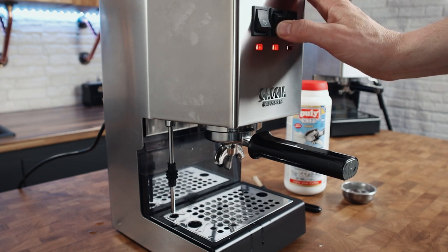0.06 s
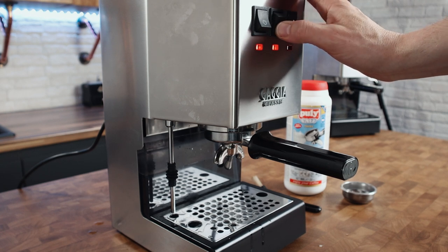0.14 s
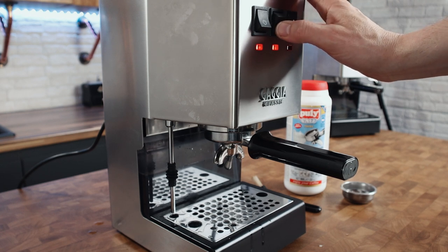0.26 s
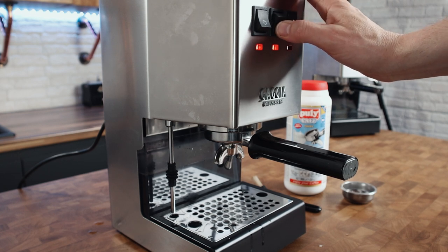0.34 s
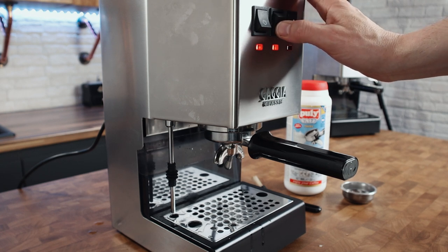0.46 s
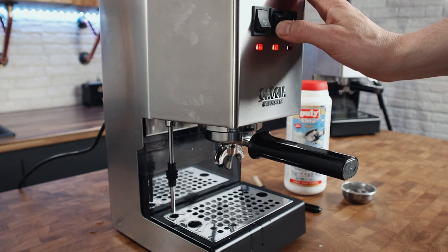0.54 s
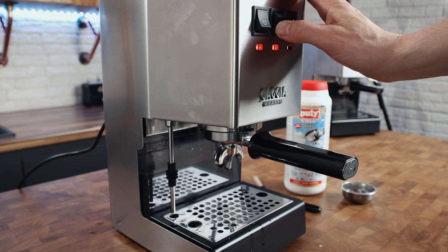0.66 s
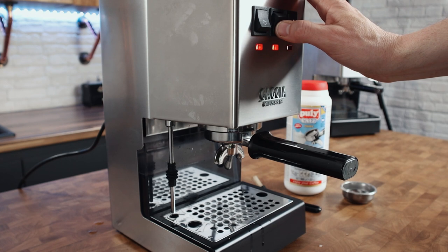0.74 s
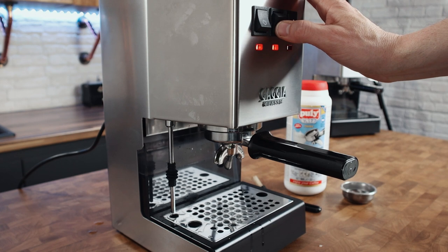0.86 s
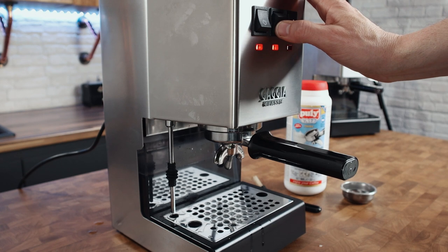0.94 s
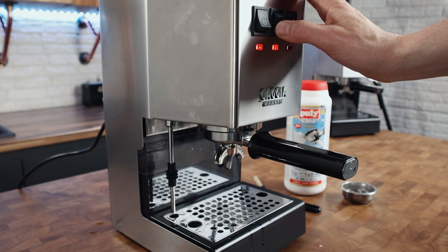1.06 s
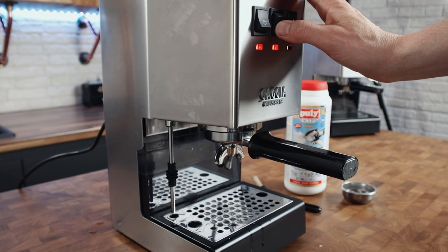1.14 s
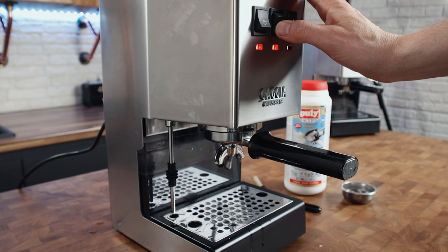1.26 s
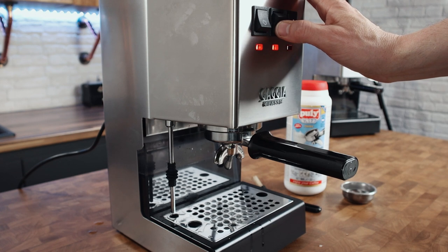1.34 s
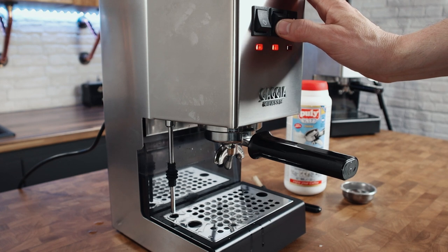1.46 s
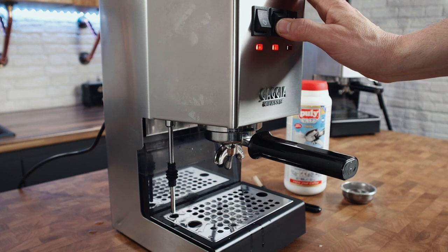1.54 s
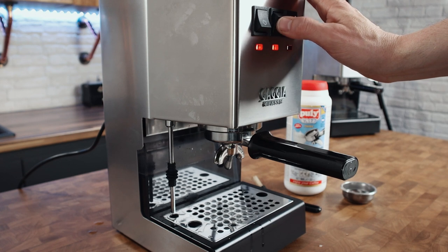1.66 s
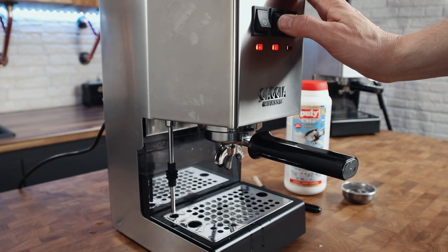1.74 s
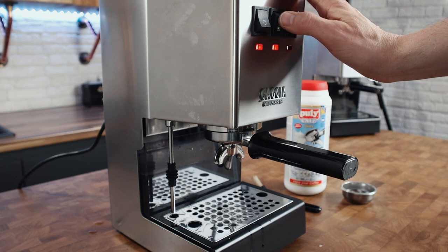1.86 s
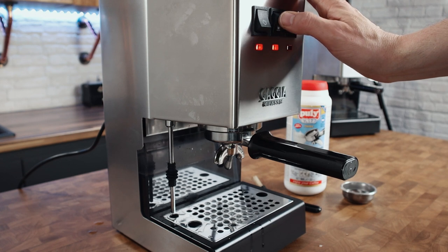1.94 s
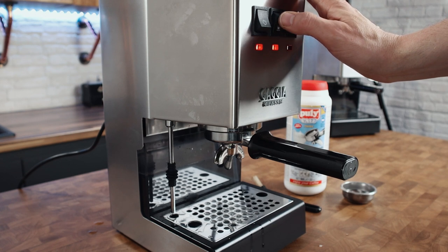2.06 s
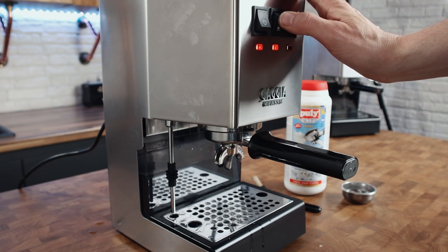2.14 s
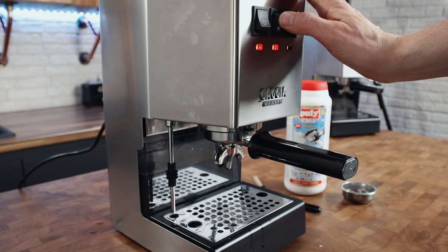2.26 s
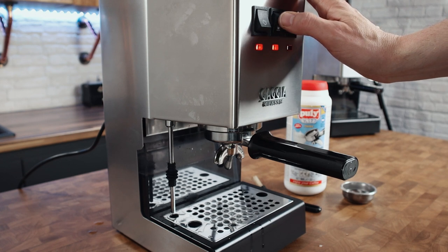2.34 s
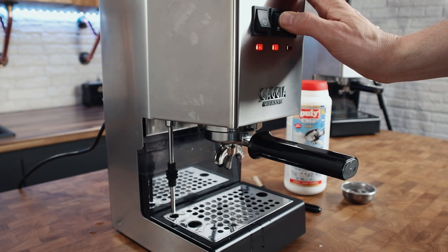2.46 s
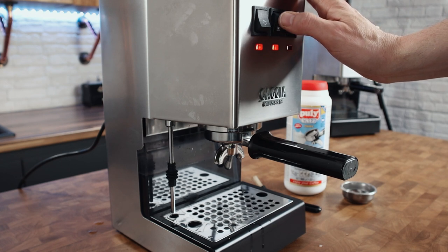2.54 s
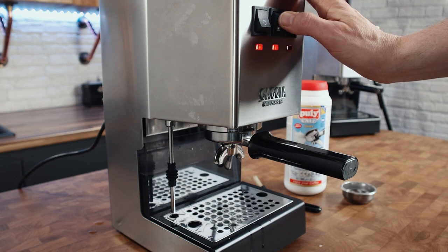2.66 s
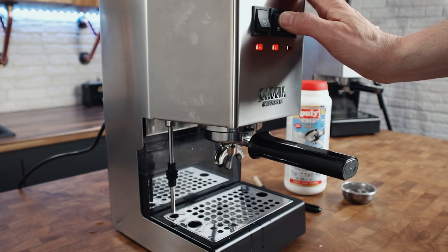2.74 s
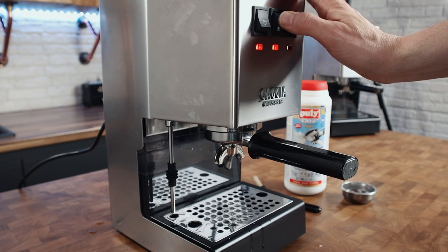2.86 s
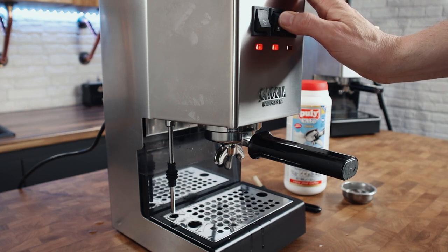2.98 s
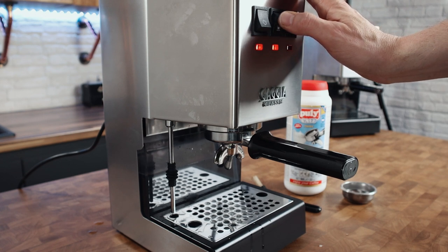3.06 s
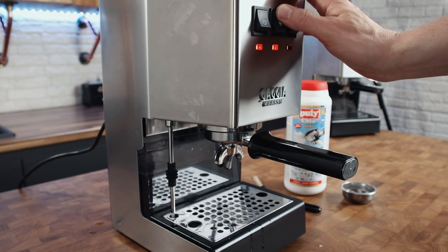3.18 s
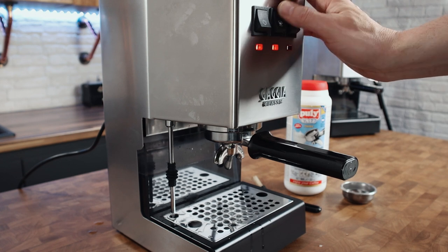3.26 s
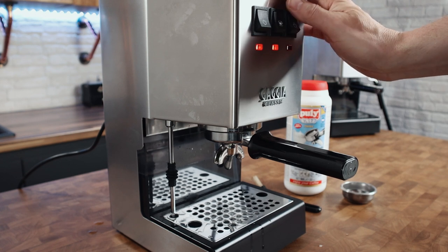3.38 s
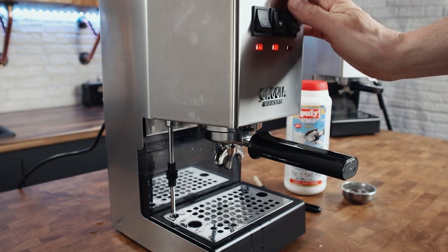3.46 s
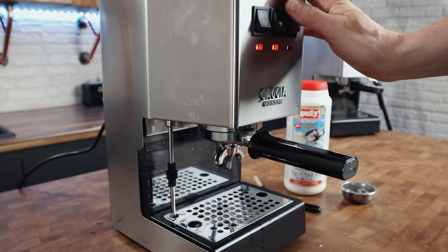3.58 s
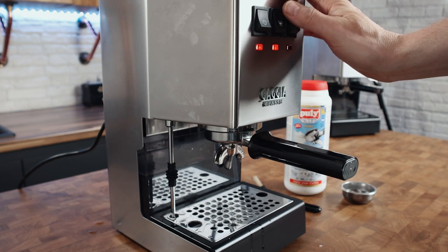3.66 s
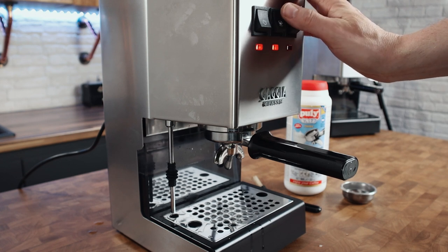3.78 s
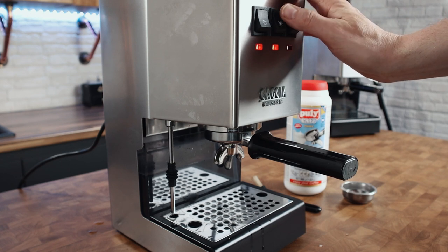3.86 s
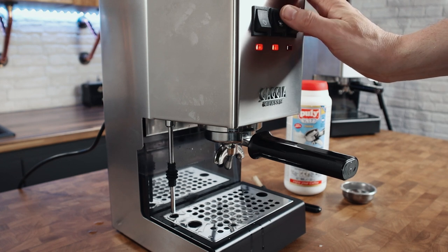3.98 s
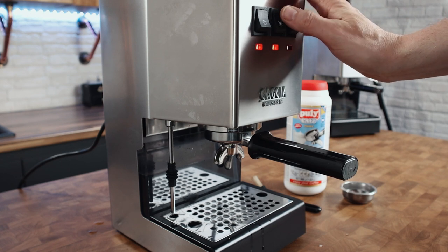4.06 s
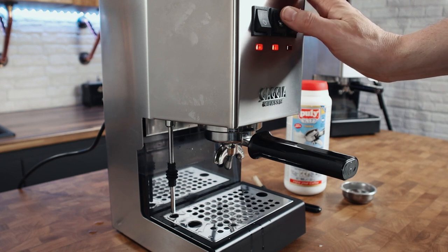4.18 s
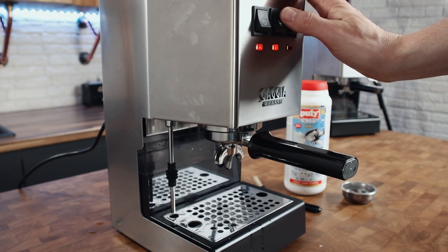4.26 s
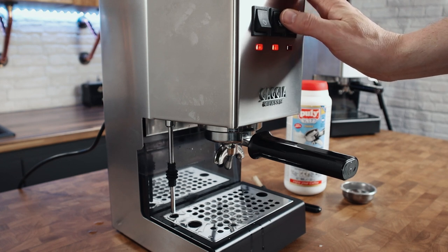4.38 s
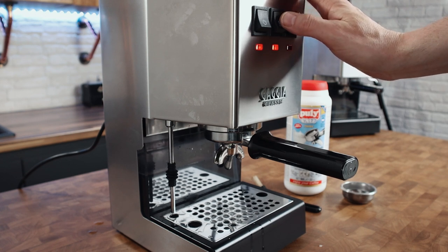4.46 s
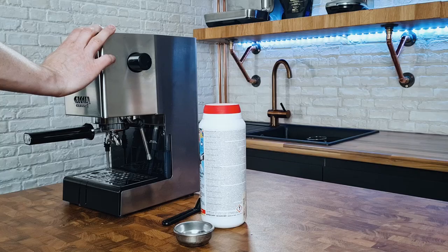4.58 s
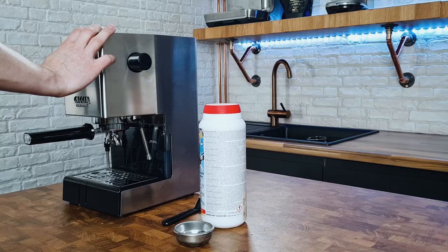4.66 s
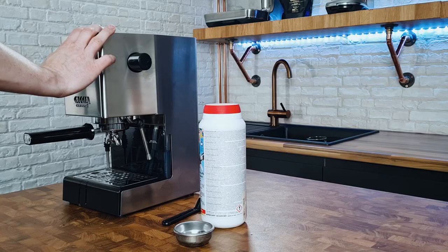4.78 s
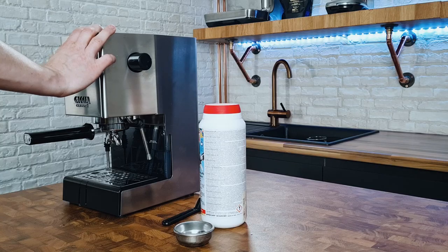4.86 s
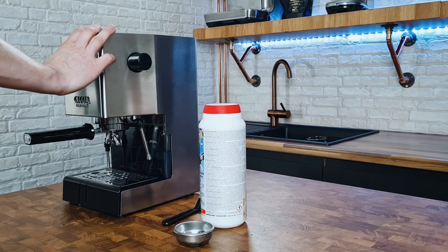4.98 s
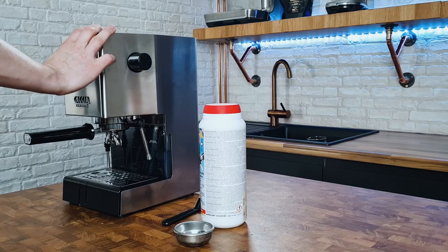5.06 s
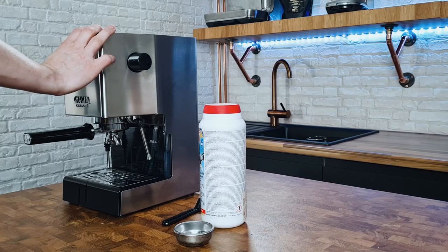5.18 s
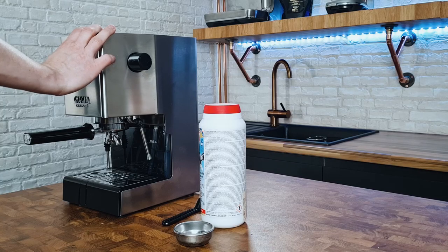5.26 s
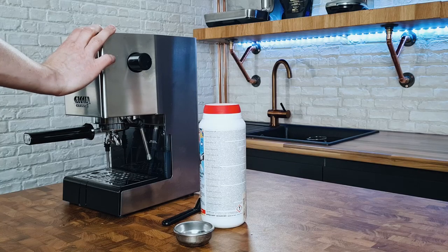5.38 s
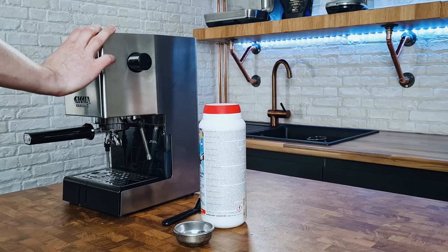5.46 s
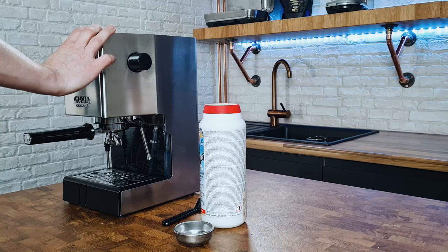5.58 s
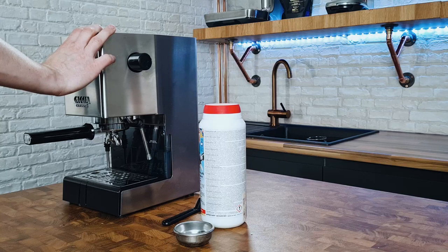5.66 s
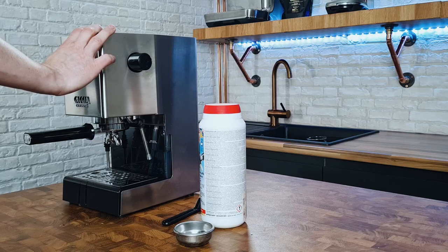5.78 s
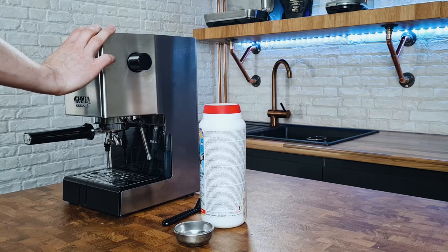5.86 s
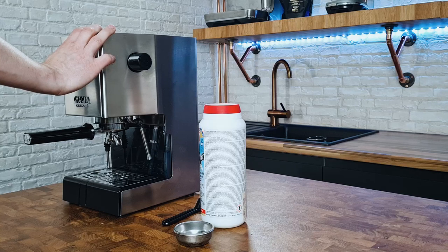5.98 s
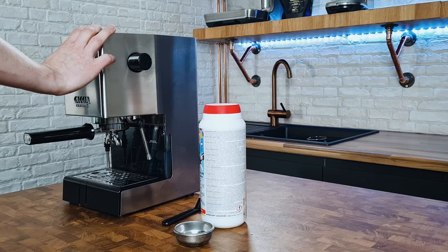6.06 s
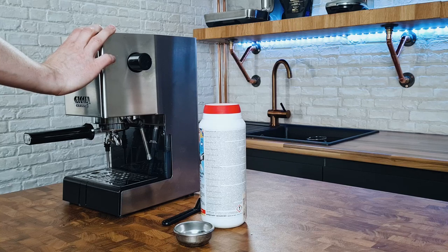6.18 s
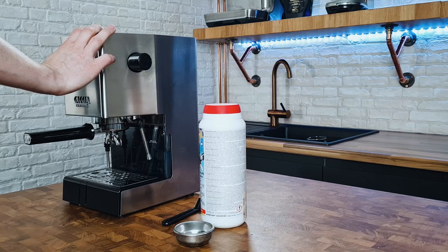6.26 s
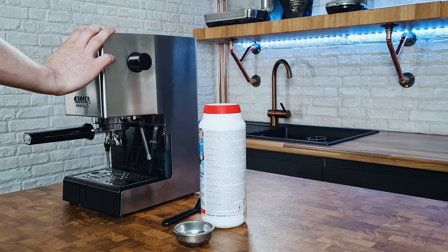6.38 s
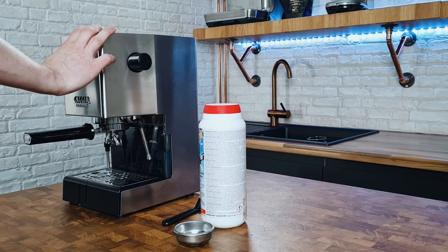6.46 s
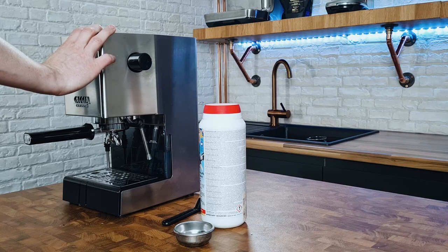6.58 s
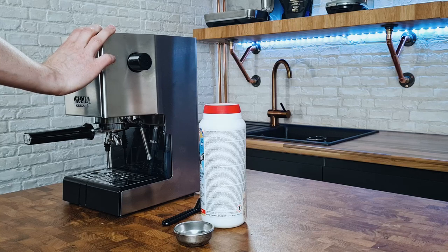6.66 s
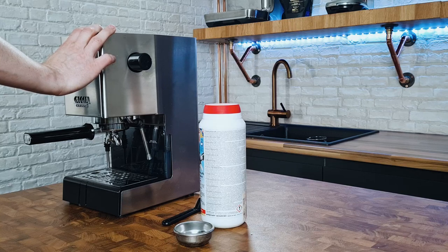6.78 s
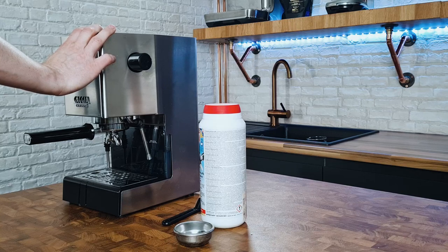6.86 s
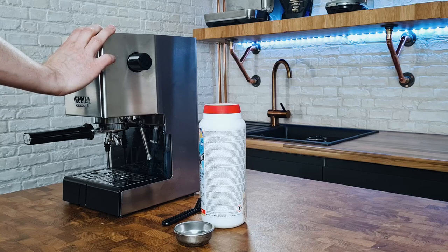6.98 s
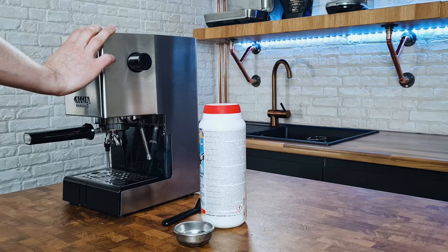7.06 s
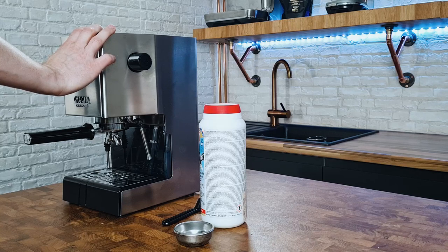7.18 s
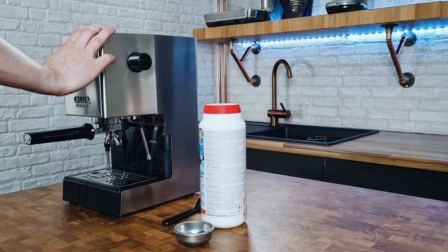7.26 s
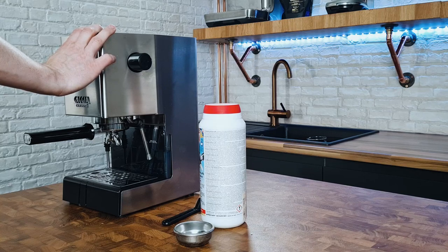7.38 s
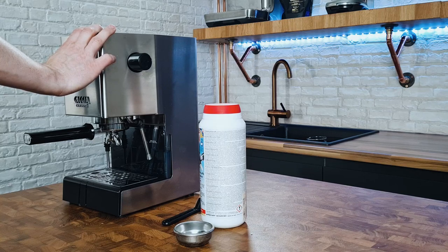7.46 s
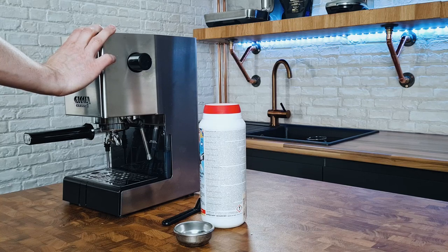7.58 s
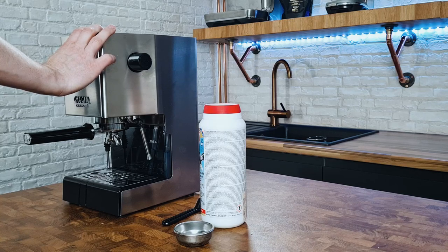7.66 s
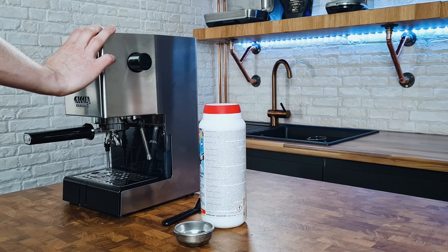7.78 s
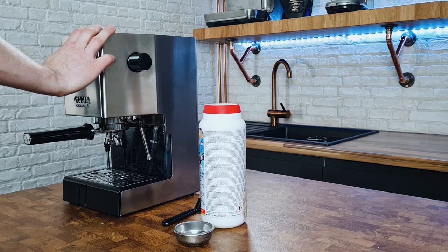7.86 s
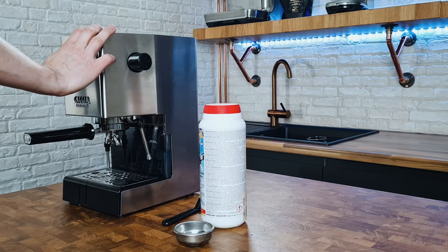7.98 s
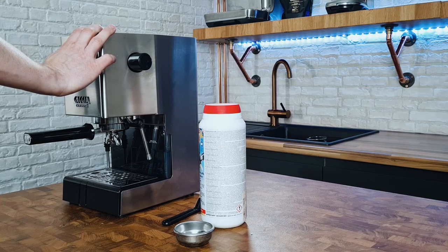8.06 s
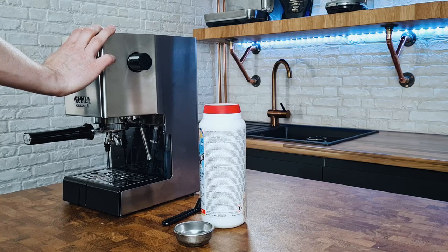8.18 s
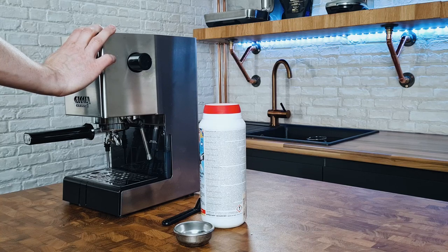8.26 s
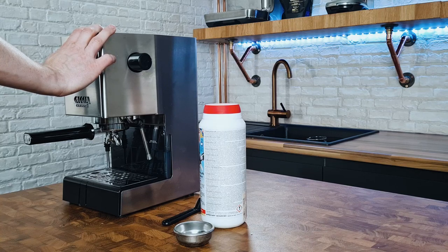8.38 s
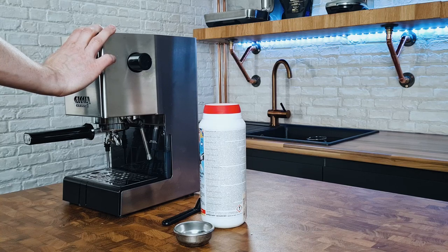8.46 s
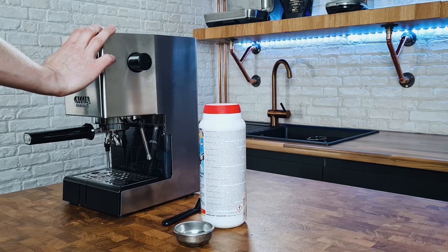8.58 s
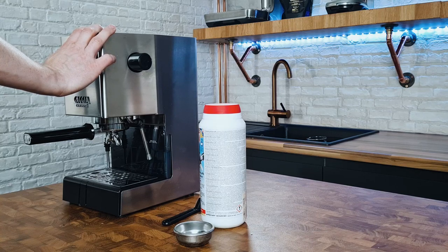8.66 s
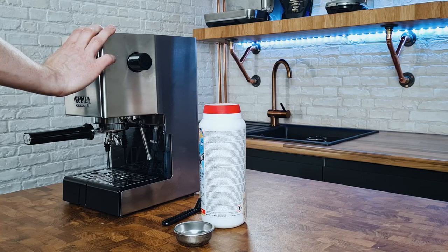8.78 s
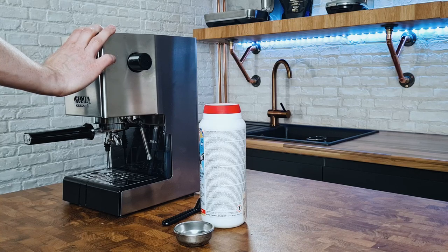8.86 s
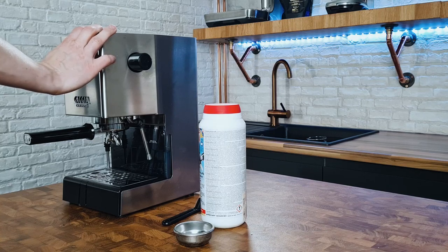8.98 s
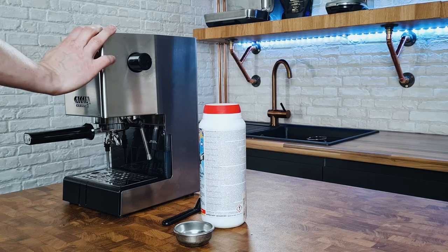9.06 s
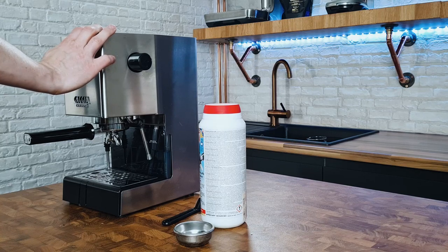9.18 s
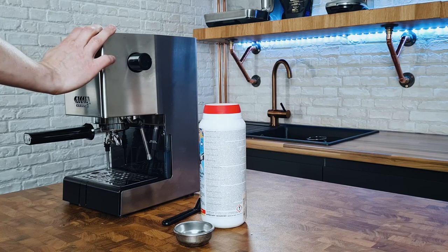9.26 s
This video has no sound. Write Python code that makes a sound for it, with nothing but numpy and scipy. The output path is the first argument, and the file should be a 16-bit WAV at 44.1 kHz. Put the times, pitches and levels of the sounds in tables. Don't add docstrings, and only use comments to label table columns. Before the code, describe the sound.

Close to the microphone in a hard-walled kitchen, an espresso machine's pump is already buzzing at mains rate, with pressurised water hissing and a loose panel rattling in bouts. A sharp clack stops it, small drips follow in the tray, and a faint room rumble remains. Another clack with a short spurt starts a second run, its tone climbing as pressure builds, until a final clack cuts it off.

```python
import sys
import numpy as np
from scipy import signal
from scipy.fft import rfft, irfft
from scipy.io import wavfile
from scipy.ndimage import uniform_filter1d

SR = 44100
rng = np.random.default_rng(int(sys.argv[2]) if len(sys.argv) > 2 else 0)


def gain_from_db(level_db):
    decades = np.asarray(level_db, float) / 20
    return 10 ** decades


def digitize_waveform(pressure):
    field = np.atleast_2d(pressure).T
    bounded = np.clip(field, -1, 1)
    quanta = np.round(bounded * 32767).astype(np.int16)
    wavfile.write(sys.argv[1], SR, quanta)


N = 411012
TIME = np.arange(N) / SR
COARSE = TIME[::40]
STROKE_HZ = 49.94

# [from t/s, to t/s]
RUN_SPANS = [
    (0, 3.25),
    (4.906, 8.99),
]
SWITCHED_ON_S = [-.17, 4.906]
STROKE_AT = [.7377, 6.0082]
FULL_AFTER_S, BUILD_S = 0.74, 0.37
START_SHARE = [0.32, .02]

# [first run level/dB, second run level/dB,
# extra at switch-on level/dB, settling t/s, first run creep/(dB/s), second run creep/(dB/s)]
CASING_LEVEL = (-49.5, -49.5, 13, 0.5, 1.3, 0.46)
PISTON_LEVEL = (-48, -50, 0, 2.7, -0.12, -0.09)
WATER_LEVEL = (-50.5, -50, 6.5, 0.25, -0.86, -1.1)

# [multiple of stroke rate, first run level/dB, second run level/dB, filling level/dB]
HUM_ORDERS = [(1, -22.5, -14.5, -13.5), (2, -2, -0.5, -5), (3, -18.5, -25.5, -14.5), (4, 2.1, -3.5, -2.5),
              (5, -3, -8.5, -7.5), (6, -3.5, 2, -0.5), (7, -2, 2.1, 1.5), (8, -6.5, -3, -16.5),
              (9, -3, -9, -7), (10, -17.5, -16.5, -13.5), (11, -10, -12, -12), (12, -8, -5.5, -4.5),
              (13, -10, -13.5, -22), (14, -11, -16, -21.5), (15, -16.5, -16, -22)]
# [f/Hz, width/Hz, first run level/dB, second run level/dB, filling level/dB]
PISTON_MODES = [(800, 34, -8, -10.5, -10.5), (964, 30, -3, -5.5, -5.5), (1145, 56, -10.5, -12, -11),
                (1200, 130, -9, -4, -11.5), (1262, 41, -8.5, -2, -11), (1570, 40, -19, -16.5, -13),
                (1524, 35, -4.5, -4.5, -16.5), (1685, 75, -5, -4.5, -21.5), (1860, 89, -21, -16.5, -15.5)]
# [t/s after switch-on, f/Hz, boost level/dB]
POCKET = [
    (0.271, 448.5, -5.5),
    (.35, 600, 6.5),
    (0.442, 950, 5),
    (.56, 1200, 0.7),
]
# [f/Hz, level/dB per Hz]
SHUDDER = [(24, -52), (40, -14), (92, 4.5), (150, 1.5), (356, 4.5), (493, -6.5), (601, 1), (733, 0.5),
           (1590, 1.5), (2020, -31), (3000, -29), (3900, -62), (6600, -120)]

# [f/Hz, level/dB per Hz]
HISS = [(1120, -17.5), (1900, -10), (2190, -6), (2810, -10.5), (3680, -9), (3980, -6.5), (5200, -8),
        (12000, -11), (13900, -13.5), (16000, -22.5)]
# [f/Hz, width/Hz, level/dB]
PIPES = [(3480, 75, -6.5), (3866, 57, -3), (3990, 110, 2.5), (4550, 100, -7.5), (4900, 49, -5.5),
         (5630, 39, -7), (5840, 60, -9.5), (8700, 470, -4), (9420, 300, -5), (12200, 135, -7.5)]

RATTLE_BEATS_DB = [1.6, -3, -1.5, -11, -3]
# [f/Hz, width/Hz, level/dB]
PANEL = [(1610, 51, 0), (1475, 40, 5), (1765, 32, -5), (1887, 56, 2.5), (1260, 61, -4)]
SLIPS = [0, .62, 1.35, 2.151, 2.401, 2.948, 4, 6.099, 6.351, 6.85, 7.651, 8.349]
# [start t/s, length t/s, level/dB]
BOUTS = [(0.468, .33, -43.5), (.84, 0.22, -42), (1.12, 0.025, -45), (1.236, 0.18, -44),
         (1.488, 0.11, -43.5), (1.722, 0.12, -44), (1.893, 0.06, -43), (2.057, .03, -46),
         (2.174, 0.021, -44), (2.233, 0.027, -44), (2.36, 0.13, -47), (2.635, 0.024, -44),
         (2.71, 0.022, -44), (2.786, 0.023, -46), (2.91, .06, -46.5), (3.05, 0.029, -46.5),
         (5.542, 0.057, -48.5), (5.626, 0.27, -44.5), (5.958, 0.37, -45), (6.386, 0.026, -45),
         (6.483, 0.17, -44.5), (6.706, 0.15, -47), (6.96, .03, -44.5), (7.047, 0.33, -56.5),
         (7.588, 0.2, -45), (7.88, 0.05, -46.5), (8.22, 0.11, -48.5), (8.406, 0.026, -48.5),
         (8.678, 0.037, -47.5), (8.92, 0.038, -48.5)]
CATCH_DB_PER_S, LET_GO_DB_PER_S = 350, 202

# [t/s, level/dB, first crack level/dB, treble tilt/(dB/octave), bass level/dB]
CLACKS = [
    (3.2487, -5, -1, -0.1, 0.3),
    (4.885, -48.5, -20, 4.5, -21),
    (4.906, -6.5, -2, 2.5, 3),
    (8.99, -5.5, 0, -0.7, 0),
]
# [t/s, level/dB]
BOUNCES = [
    (-.0013, -23.5),
    (.0021, -4.5),
    (.005, -10),
    (.013, -8),
]
# [f/Hz, level/dB per Hz]
CLACK = [(88, -43.5), (150, -7), (460, -15.5), (528, -5.5), (752, -13.5), (880, -6), (1470, -7), (1860, 4),
         (2950, -2), (3500, -8.5), (5470, -15.5), (11800, -22.5), (15200, -48), (16500, -34)]
# [f/Hz, level/dB, t60 t/s]
CASING = [(1113, -5, 0.2), (1725, -7, 0.32), (2950, -2.5, 0.25), (2680, -10, 0.2), (2020, -5, 0.26),
          (2380, -1, 0.19), (2397, 2.5, 0.39), (3350, -18, 0.24), (4231, -18, 0.2), (5800, -9.5, 0.12),
          (7063, -25.5, 0.23), (7826, -28, 0.26)]
# [f/Hz, t60 t/s]
TAIL = [(200, 0.37), (530, 0.47), (1390, 0.38), (3680, 0.36), (9700, 0.33)]
EDGES = 35 * 2 ** np.arange(0, 9, 1 / 3)

# [t/s, peak level/dB, f/Hz, t60 t/s]
DRIPS = [
    (3.426, -34.5, 2450, 0.26),
    (3.487, -40, 1650, 0.23),
    (3.649, -79, 1230, .2),
    (4.913, -14.5, 10300, 0.22),
]
# [t/s, level/dB, brightness between 220 and 820 Hz level/dB]
RUMBLE = [
    [(3.6, -65, -14), (4.4, -63, -20), (4.7, -57, -15), (4.88, -53, -12.5)],
    [(9.2, -64.5, -26), (9.32, -65.5, -22)],
]
# [f/Hz, level/dB per Hz]
ROOM = [(24, -47.5), (40, -19), (59, -16), (97, -3), (194, -13), (214, -8.5), (234, -5), (254, -22),
        (319, -24.5), (497, -35), (549, -36), (670, -33.5), (1200, -41), (1560, -82.5), (2640, -120)]
# [f/Hz, level/dB per Hz]
AIR = [(590, -33), (1000, -3), (1450, -1), (1790, -8), (2350, -5), (4080, -16), (7690, -11), (12500, -8),
       (16200, -38), (22000, -120)]
AIR_DB = -83


def rms_one(x):
    return x / np.sqrt(np.mean(x ** 2) + 1e-20)


def in_time(rows):
    s, *columns = np.transpose(rows)
    return [np.interp(TIME, s, c) for c in columns]


def at_hz(points, hz):
    table = np.array(points)
    return np.interp(np.log(hz), np.log(table[:, 0]), table[:, 1])


def slow_chance(rate):
    r = np.exp(-80 * np.pi * rate / SR)
    white = rng.standard_normal(len(COARSE) + 2000)
    return rms_one(signal.lfilter([1], [1, -2 * r, r * r], white)[2000:])


def drift(rate):
    return np.interp(TIME, COARSE, slow_chance(rate))


def coloured(spectrum, size=N):
    hz = np.maximum(np.fft.rfftfreq(size, 1 / SR), 1)
    return rms_one(irfft(rfft(rng.standard_normal(size)) * gain_from_db(at_hz(spectrum, hz)), size))


def band(x, low_hz, high_hz):
    return signal.sosfilt(signal.butter(2, [low_hz, min(high_hz, .45 * SR)], "band", fs=SR, output="sos"), x)


def resonances(x, peaks):
    out = 0
    for k, (hz, width, db) in enumerate(peaks):
        r = np.exp(-np.pi * width / SR)
        b = np.array([1, 0, -1]) * (1 - r * r) / 2
        a = [1, -2 * r * np.cos(2 * np.pi * hz / SR), r * r]
        out = out + (-1) ** k * gain_from_db(db) * signal.lfilter(b, a, x + 1e-18)
    return out


def by_run(values):
    return np.where(TIME < RUN_SPANS[1][0], *values)


def since_on():
    return TIME - by_run(SWITCHED_ON_S)


def settling(first_db, second_db, extra_db, settle_s, first_creep, second_creep):
    t = np.maximum(since_on(), 0)
    steady_db = by_run([first_db, second_db])
    return steady_db + extra_db * np.exp(-t / settle_s) + by_run([first_creep, second_creep]) * t


def powered(fall_s):
    on = sum((TIME >= start) & (TIME < stop) for start, stop in RUN_SPANS)
    r = np.exp(-1 / (fall_s * SR))
    return signal.lfilter([1 - r], [1, -r], on, zi=[r])[0]


def orders(count):
    hz, width, *levels_db = np.transpose(PISTON_MODES)
    rows = list(HUM_ORDERS)
    for k in range(len(rows) + 1, count + 1):
        near = 1 / (1 + (2 * (k * STROKE_HZ - hz) / width) ** 2)
        rows.append((k, *(10 * np.log10(np.sum(near * gain_from_db(2 * db))) for db in levels_db)))
    return rows


def hum(casing_db, ring_db):
    turns, low, high = 2 * np.pi * STROKE_HZ * TIME, 0, 0
    s, *columns = np.transpose(POCKET)
    pocket_hz, boost_db = (np.interp(since_on()[::40], s, c) for c in columns)
    start_share = np.clip(by_run(START_SHARE), 0, 1)
    pressure = np.clip(1 + (since_on() - FULL_AFTER_S) / BUILD_S, start_share, 1)
    share, first = pressure[::40], COARSE < RUN_SPANS[1][0]
    for k, first_db, second_db, filling_db in orders(count=40):
        level_db = share * np.where(first, first_db, second_db) + (1 - share) * filling_db
        level_db += boost_db * np.exp(-((k * STROKE_HZ - pocket_hz) / 130) ** 2)
        level = gain_from_db(level_db + 2.02 * slow_chance(5))
        spread = np.pi / 2 * (k % 2) + 4.53 * rng.random()
        phase = spread + (0.44 + (k / 42) ** 3) * slow_chance(8.4)
        line = np.interp(TIME, COARSE, level) * np.cos(k * turns + np.interp(TIME, COARSE, phase))
        if k < 16:
            low = low + line
        else:
            high = high + line
    uneven = coloured(SHUDDER) * gain_from_db(0.51 * drift(4))
    low = rms_one(low) + gain_from_db(-3.5) * rms_one(band(uneven, 30, 1100))
    high = rms_one(high) + gain_from_db(-8 + 4 * pressure) * rms_one(band(uneven, 800, 3000))
    casing = gain_from_db(casing_db - 2.5) * low * powered(0.086)
    piston = gain_from_db(ring_db - 0.5) * high * powered(0.022)
    return casing + piston


def hiss(level_db):
    stroke = STROKE_HZ * (TIME - by_run(STROKE_AT))
    force = 1 + .35 * drift(15)
    swell_db = 2.15 * np.cos(2 * np.pi * stroke) + 0.91 * np.cos(4 * np.pi * stroke - 1.0)
    swell = gain_from_db(force * swell_db + 0.58 * drift(27))
    same = np.interp(stroke % 1, np.linspace(0, 1, 1766), rng.standard_normal(1766))
    white = rng.standard_normal(N) + .75 * rms_one(same) * gain_from_db(2.0 * drift(6))
    smooth = rms_one(irfft(rfft(white) * gain_from_db(at_hz(HISS, np.fft.rfftfreq(N, 1 / SR) + 1)), N))
    piped = rms_one(resonances(white[::-1], PIPES))
    return gain_from_db(level_db + 0.24) * rms_one(swell * (smooth + gain_from_db(-6.0) * piped))


def bouts():
    start, length, db = np.transpose(BOUTS)[:, :, None]
    catch_db = CATCH_DB_PER_S * np.maximum(start - COARSE, 0)
    let_go_db = LET_GO_DB_PER_S * np.maximum(COARSE - start - length, 0)
    return np.interp(TIME, COARSE, (db - catch_db - let_go_db).max(axis=0))


def rattle():
    level_db = bouts()
    strokes = (TIME - by_run(STROKE_AT) + .0032) * STROKE_HZ + np.searchsorted(SLIPS, TIME)
    beat = np.floor(strokes * 5 / 2).astype(int)
    at = np.flatnonzero(np.diff(beat))
    chance = rng.standard_normal((len(at), 2))
    late = np.clip(at + np.round(3.87 * chance[:, 0]).astype(int), 0, N - 1)
    beat_db = np.array(RATTLE_BEATS_DB)[beat[at + 1] % len(RATTLE_BEATS_DB)]
    touches = np.zeros(N)
    touches[late] = gain_from_db(beat_db + 2.1 * chance[:, 1])
    touches *= np.sqrt(np.maximum(gain_from_db(2 * level_db) - gain_from_db(2 * -55), 0))
    t = np.arange(-200, 201) / SR
    soft = np.exp(-(t / 0.0016) ** 2) * np.cos(2 * np.pi * 1630 * t)
    hard = np.exp(-(t / 0.0027) ** 2) * np.cos(2 * np.pi * 4700 * t)
    push = np.convolve(touches, soft, "same")
    tick = np.convolve(touches ** 2, hard, "same")
    ring = push + gain_from_db(-2) * resonances(push + 8 * touches, PANEL)
    return gain_from_db(6.5) * ring + gain_from_db(33.0) * tick


def clack(crack_db, treble_db, bass_db, size):
    t = np.arange(size) / SR - .005
    after = np.maximum(t, 0)
    contact = np.zeros(size)
    for s, db in [(0.00097, 0.0046)] + BOUNCES:
        contact[round((s + .005) * SR)] = gain_from_db(db)
    crack = resonances(contact, [(2270, 700, -0.2), (4200, 1700, -8), (8380, 5000, -17.5)])
    rings = 0
    for hz, db, t60 in CASING:
        level = gain_from_db(db + 5.6 * rng.standard_normal() - 60 * after / t60)
        rings = rings + level * np.sin(2 * np.pi * hz * after * rng.normal(1, 0.041))
    noise, tail = coloured(CLACK, size), 0
    for low, high in zip(EDGES[6:], EDGES[7:]):
        tilt_db = treble_db * max(np.log2(low / 3000), 0) + bass_db * (low < 800)
        rise = 1 - np.exp(-after * low / 6.2)
        two_slopes = gain_from_db(-60 * after / at_hz(TAIL, low)) + 0.69 * gain_from_db(-60 * after / 0.15)
        tail = tail + gain_from_db(tilt_db) * rise * two_slopes * band(noise, low, high)
    return gain_from_db(crack_db) * crack / abs(crack).max() + gain_from_db(-32.0) * rings + gain_from_db(-7.5) * tail


def clacks():
    out, size = np.zeros(N + SR), SR * 3 // 4
    for s, db, crack_db, treble_db, bass_db in CLACKS:
        start = round((s - .005) * SR)
        out[start:start + size] += gain_from_db(db) * clack(crack_db, treble_db, bass_db, size)
    return out[:N]


def rumble():
    level_db, bright_db = in_time(RUMBLE[0] + RUMBLE[1])
    noise = coloured(ROOM) * gain_from_db(1.5 * drift(12))
    low = gain_from_db(level_db) * (noise + gain_from_db(bright_db + 6) * rms_one(band(noise, 220, 820)))
    return low + gain_from_db(AIR_DB + 4 + 2 * drift(3)) * coloured(AIR)


def drips():
    out = np.zeros(N)
    for s, peak_db, hz, t60 in DRIPS:
        after = TIME - s
        splash = rng.standard_normal(N) * (after >= 0) * gain_from_db(-60 * np.clip(after, 0, 1) / t60)
        splash = band(splash, hz / 1.65, hz * 1.3)
        out += gain_from_db(peak_db) * splash / abs(splash).max()
    return out


def scene():
    casing_db, ring_db, hiss_db = (settling(*rule) for rule in (CASING_LEVEL, PISTON_LEVEL, WATER_LEVEL))
    pump = hum(casing_db, ring_db) + powered(0.034) * (hiss(hiss_db) + rattle())
    room = (1 - powered(0.088)) * rumble()
    return (pump + clacks() + room + drips())[None]


def band_limit(x):
    return signal.sosfilt(signal.butter(12, 16610, fs=SR, output="sos"), x)


def record(dry):
    upper = signal.sosfilt(signal.butter(2, 500, "high", fs=SR, output="sos"), dry)
    level_db = 10 * np.log10(uniform_filter1d(upper ** 2, size=2048) + 1e-14)
    cut = gain_from_db(np.clip(0.033 * (level_db + 50), -8, 0))
    top = signal.cheby2(10, 60, 16800, fs=SR, output="sos")
    mix = signal.sosfilt(top, dry + (cut - 1) * upper)
    return band_limit(mix)


dry = scene()
out = record(dry)
digitize_waveform(out)
```